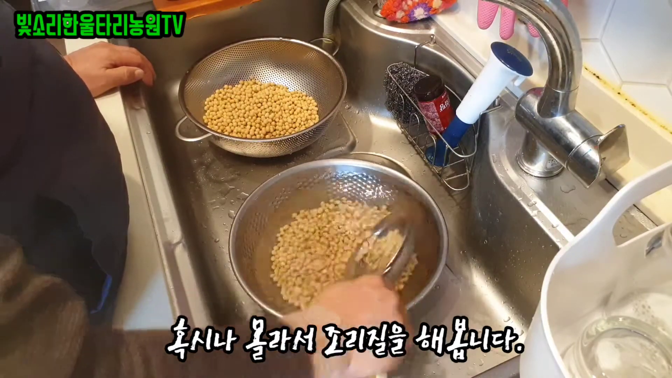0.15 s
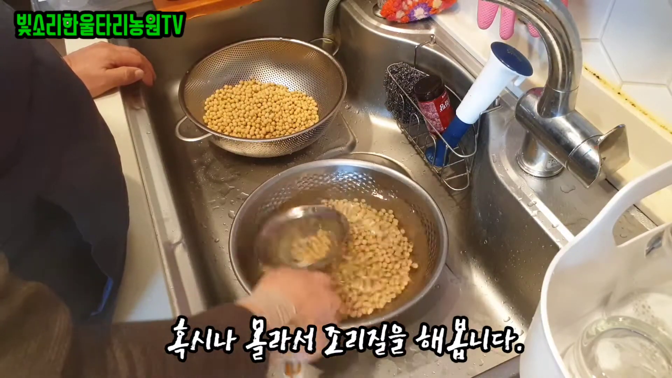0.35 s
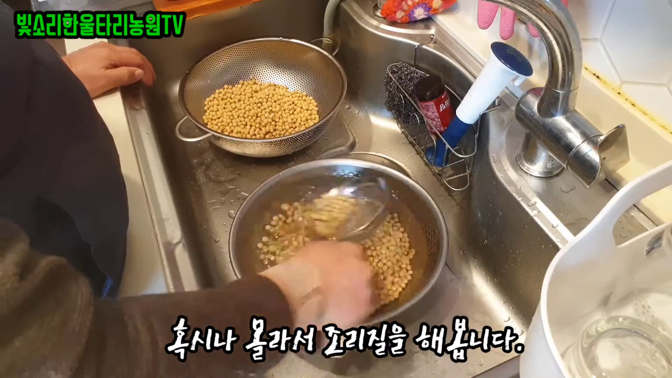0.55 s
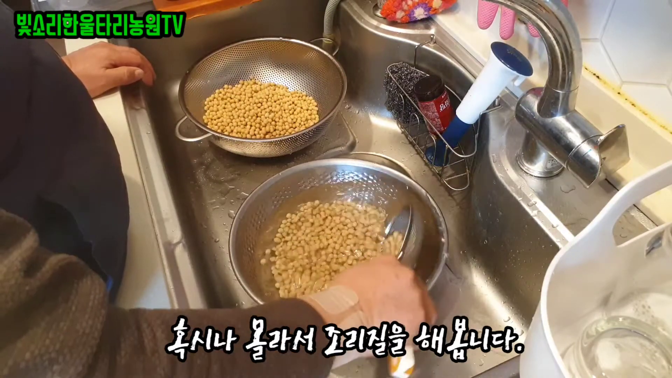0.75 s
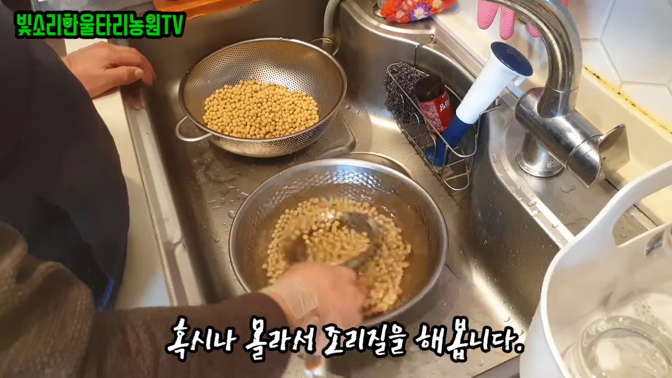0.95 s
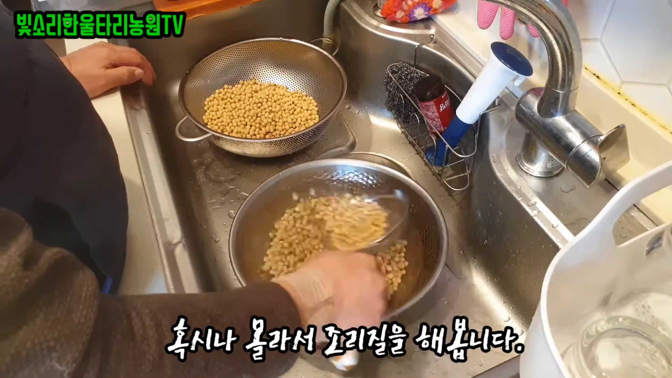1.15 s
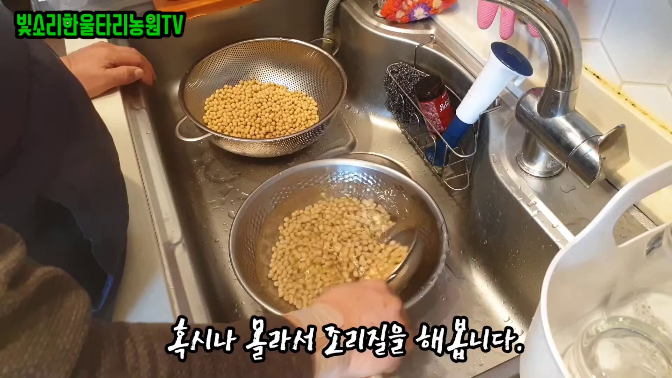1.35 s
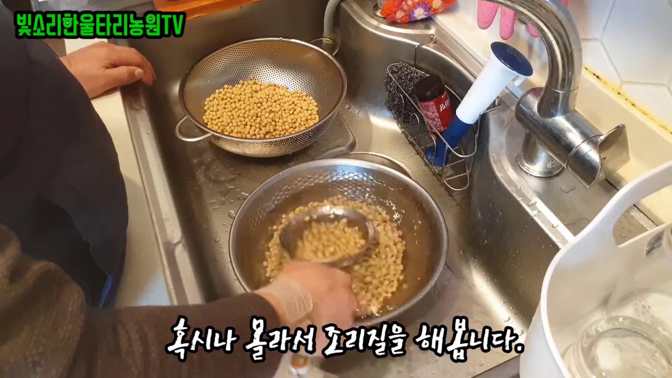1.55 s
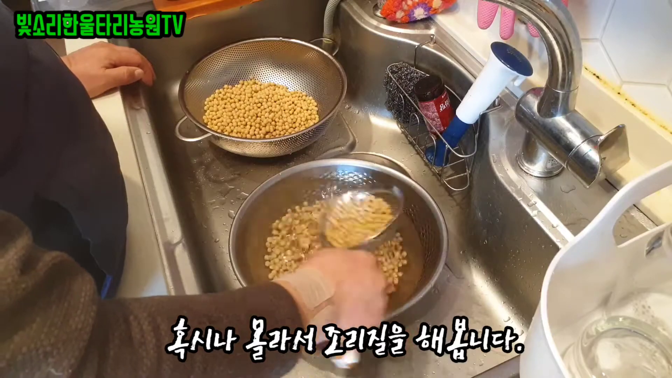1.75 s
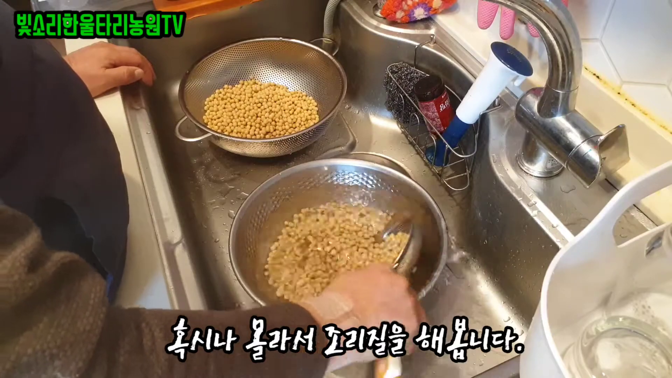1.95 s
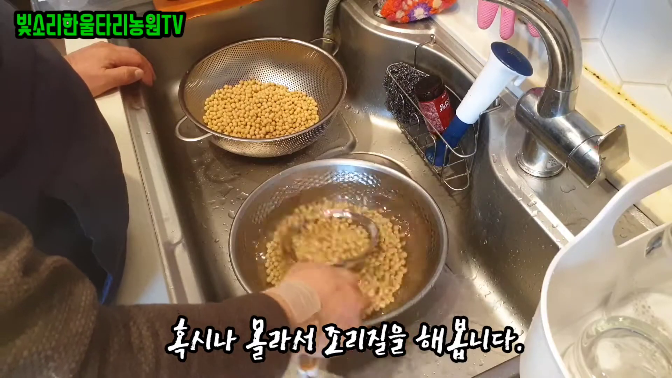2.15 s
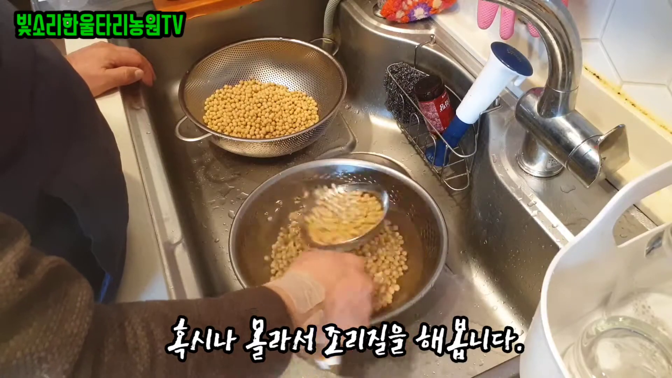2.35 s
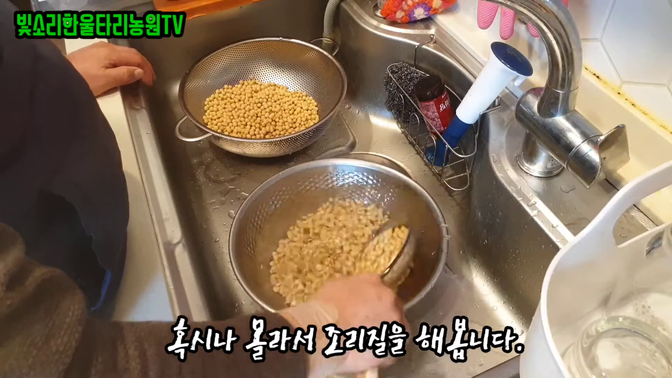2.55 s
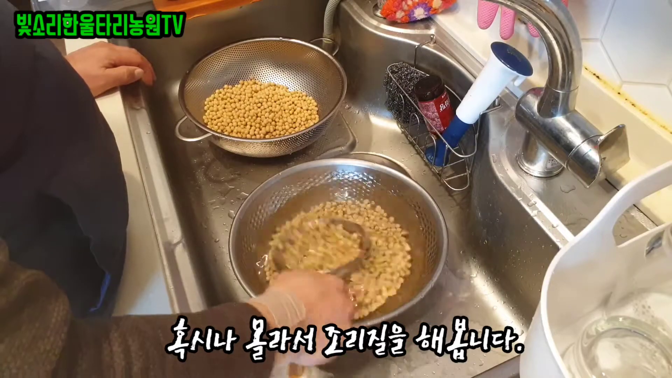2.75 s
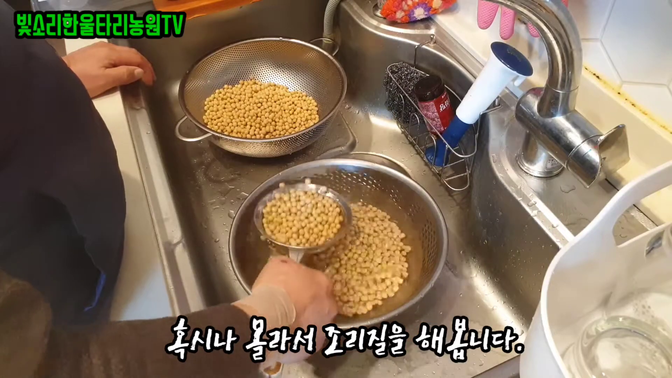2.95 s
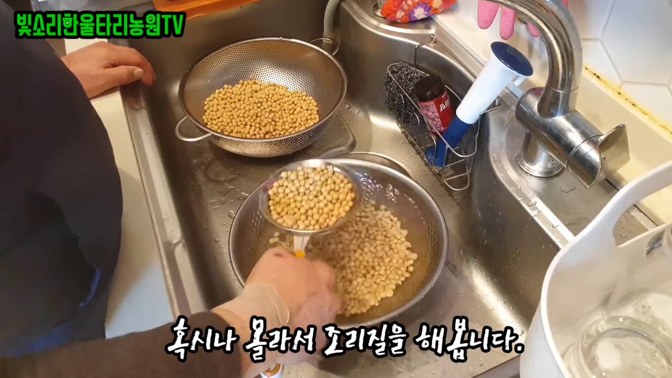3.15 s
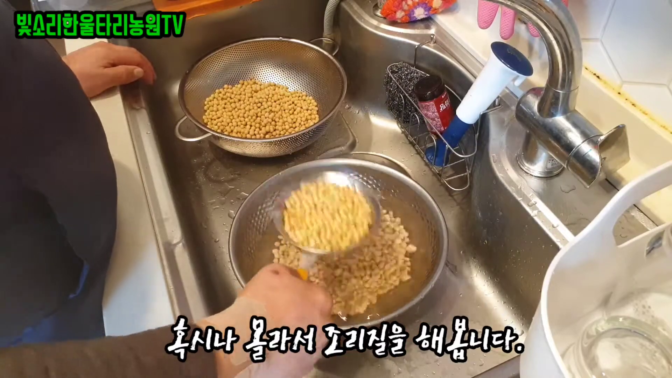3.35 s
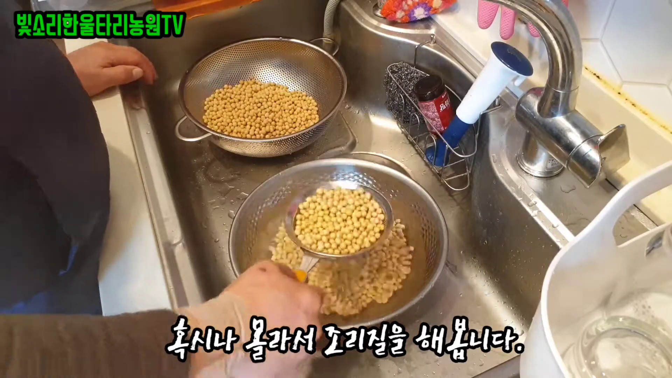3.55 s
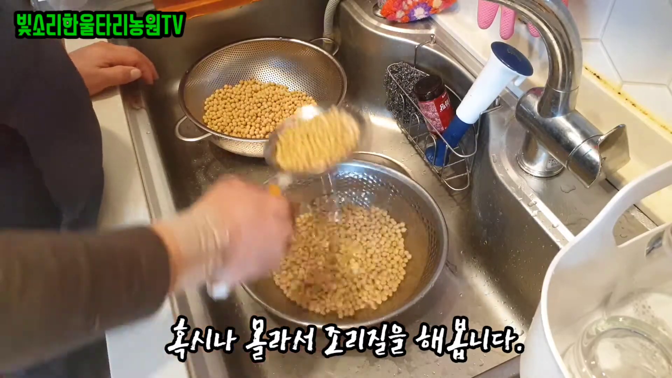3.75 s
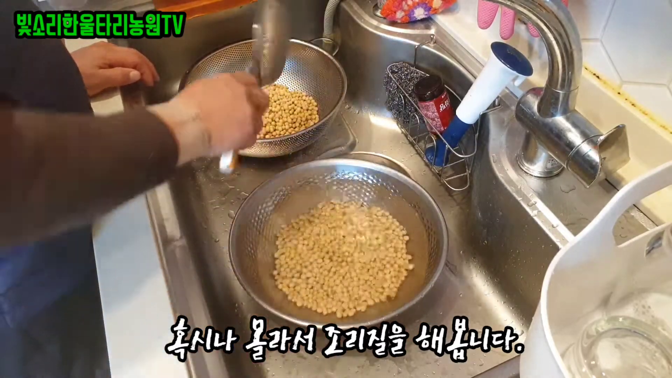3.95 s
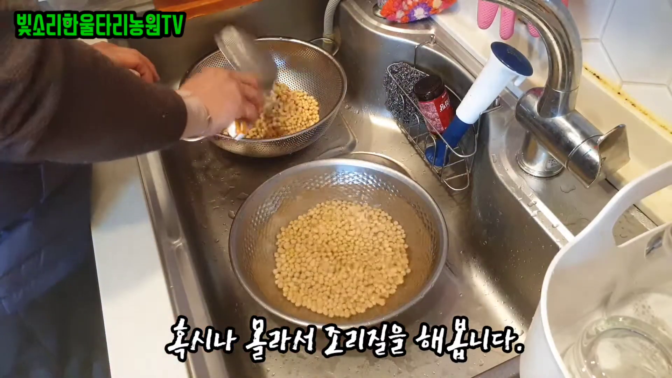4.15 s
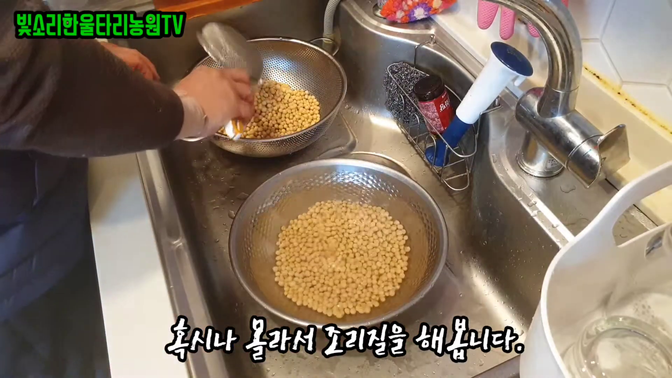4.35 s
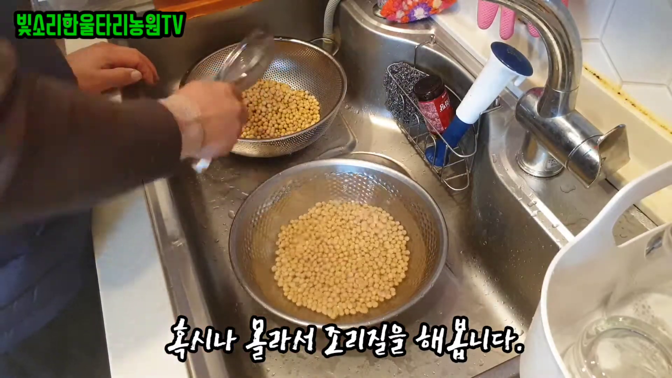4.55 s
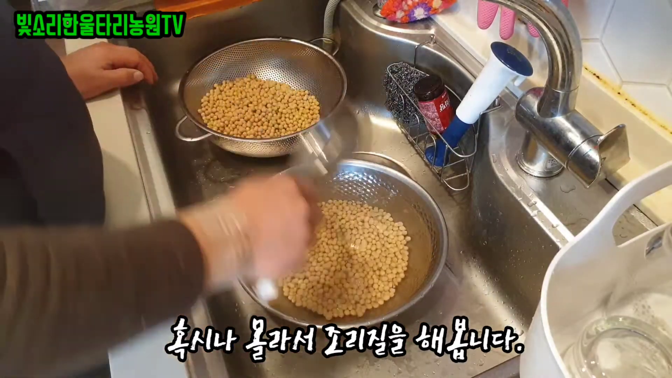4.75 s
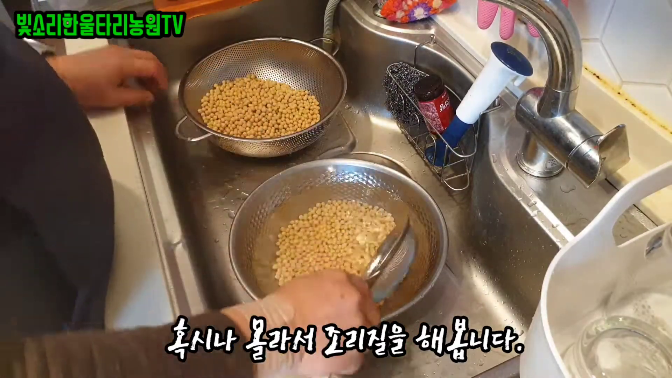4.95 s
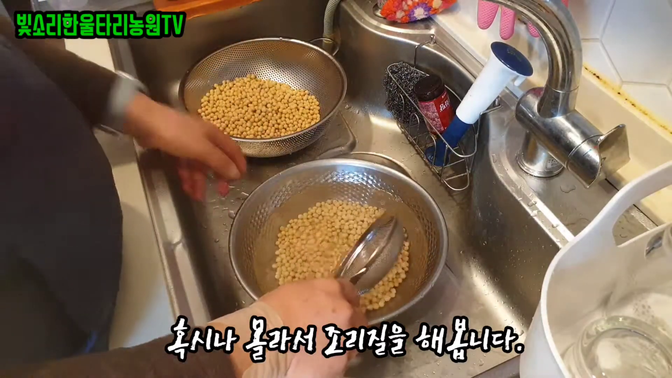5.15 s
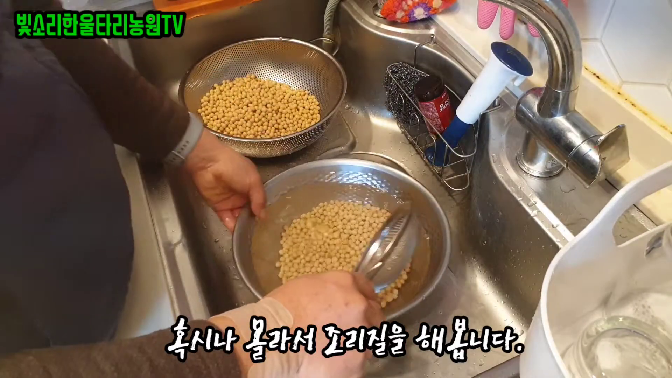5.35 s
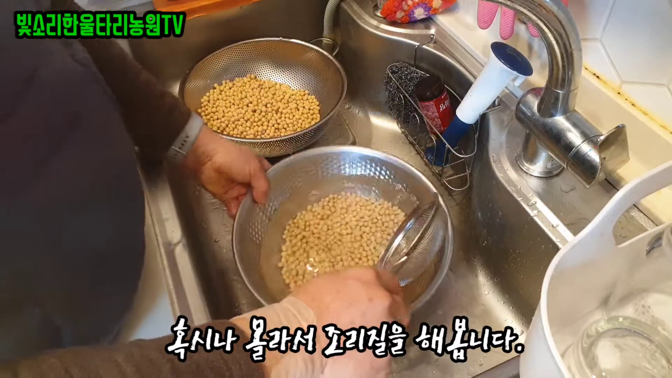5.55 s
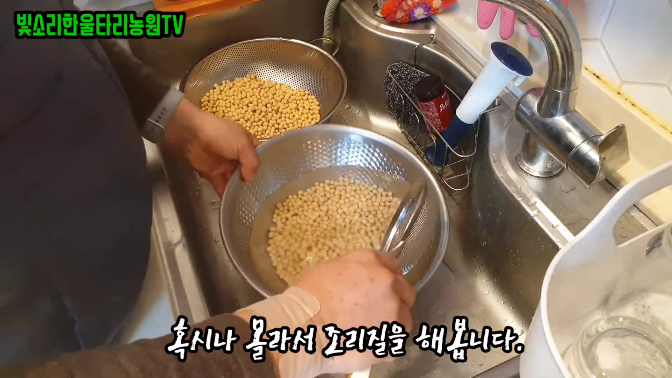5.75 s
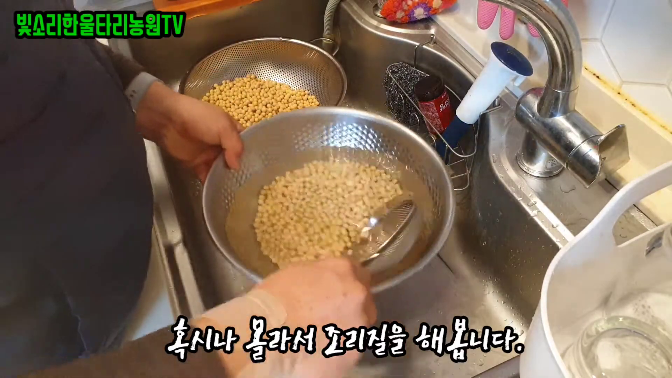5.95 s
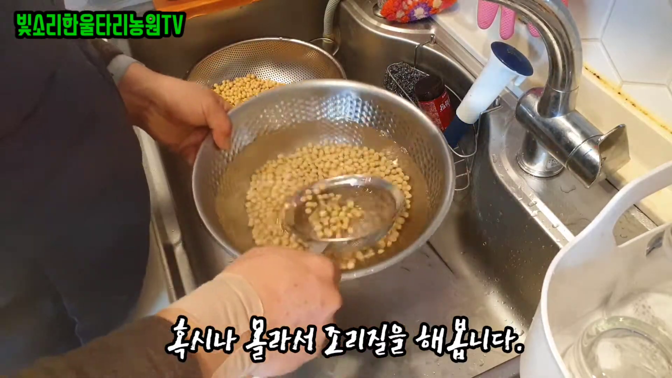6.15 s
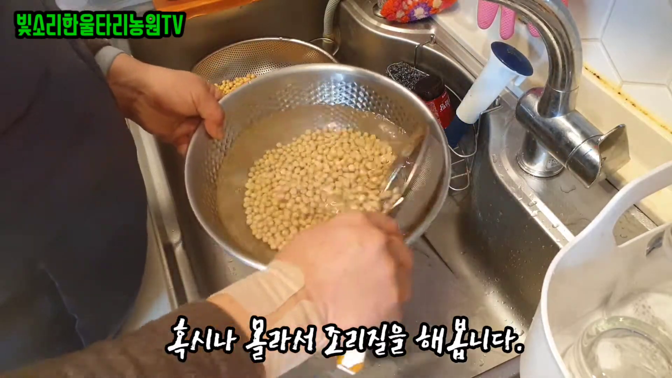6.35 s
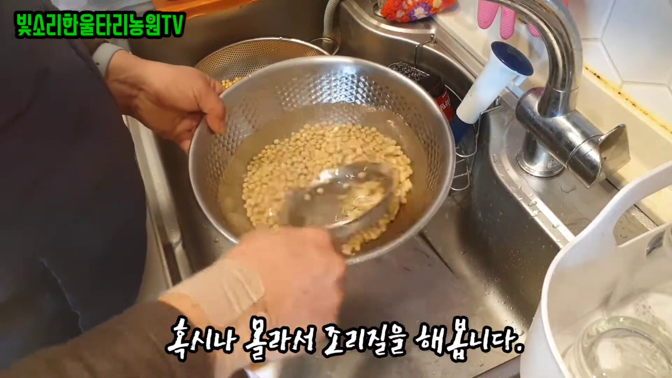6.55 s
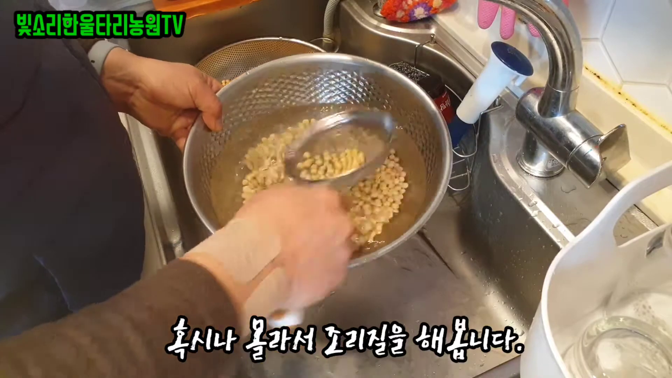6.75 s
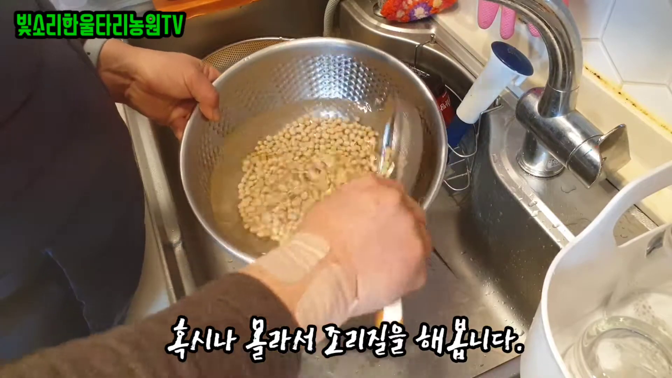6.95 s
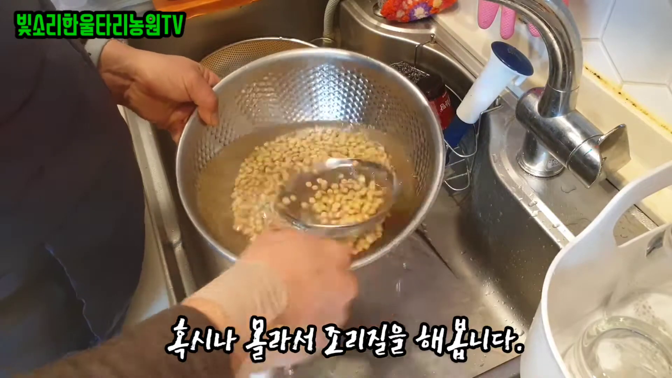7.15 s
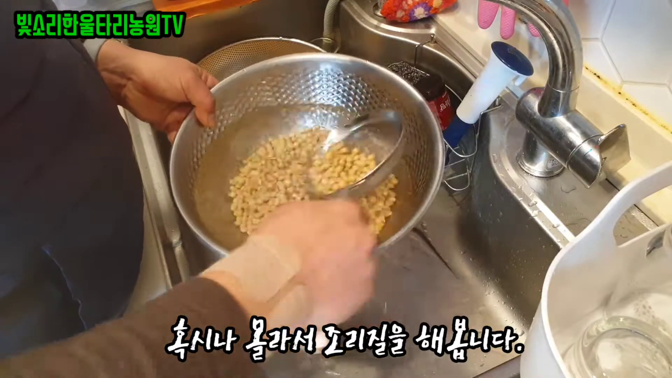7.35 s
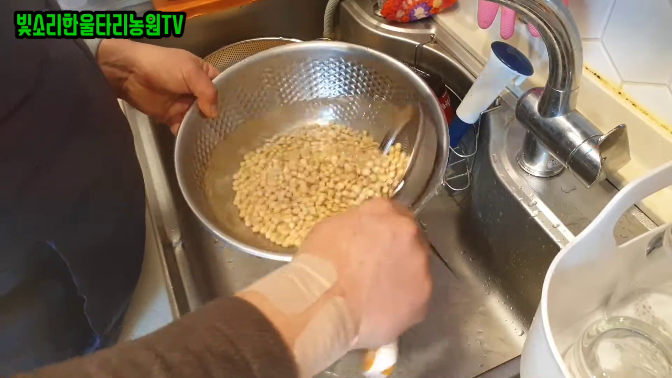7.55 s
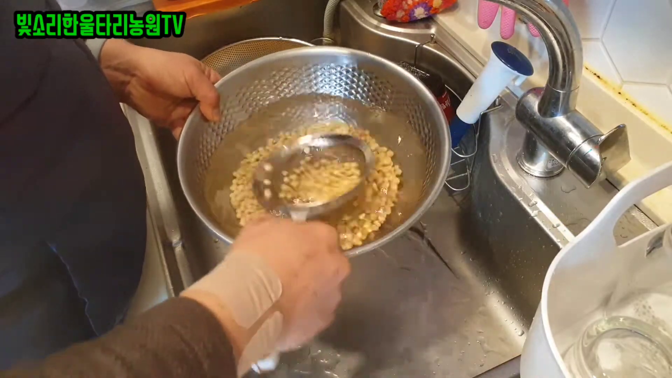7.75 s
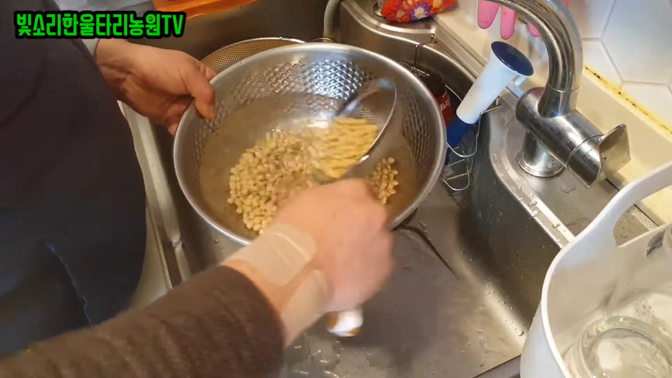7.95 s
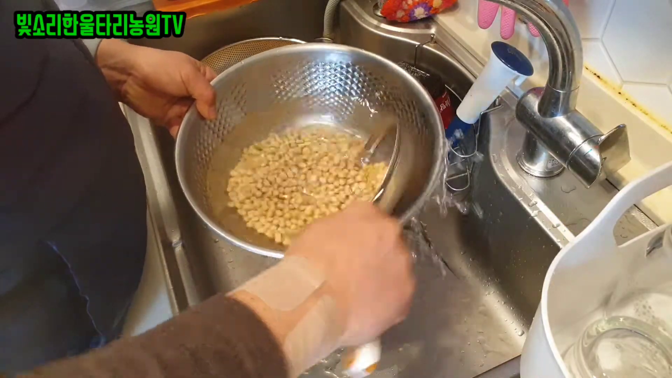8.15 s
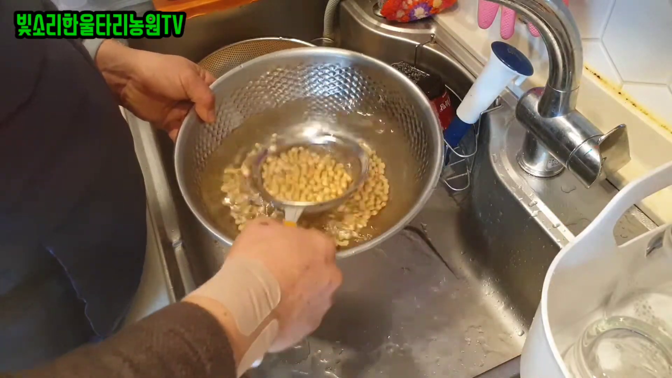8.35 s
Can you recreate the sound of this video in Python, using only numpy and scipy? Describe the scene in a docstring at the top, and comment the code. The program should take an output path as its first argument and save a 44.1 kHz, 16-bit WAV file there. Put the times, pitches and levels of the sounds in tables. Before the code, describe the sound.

A mesh scoop swirls beans through water with gritty, splashy scrapes; a pause brings one bright metallic bean dump, then brisk swishing returns.

```python
"""Soybeans are swirled with a mesh scoop in a perforated steel bowl of water that stands in a kitchen sink.
Each stroke is shaped noise: random contacts for beans on steel, bubble tones for churned water, crackle for spray.
Drags, bumps and dull knocks boom in the sink. A scoopful drips, then is tipped rattling into a colander,
which rings on its own modes. The bowl is tilted up from the sink and the sifting goes on over faint room noise."""
import sys
import numpy as np
from scipy import signal
from scipy.fft import rfft, irfft
from scipy.io import wavfile
from scipy.ndimage import uniform_filter1d, map_coordinates

SR = 44100
rng = np.random.default_rng(int(sys.argv[2]) if len(sys.argv) > 2 else 0)


def put_to_file(sound):
    """Save the sound as 16-bit audio at rate SR, in the file named by the first command-line argument."""
    columns = np.atleast_2d(sound).T  # one column per channel
    safe = np.clip(columns, -1, 1)
    whole_steps = np.round(safe * 32767)
    wavfile.write(sys.argv[1], SR, whole_steps.astype(np.int16))


N = 374850
TIME = np.arange(N) / SR

# All table levels are relative: each source and the final mix apply further gain.
# Strokes of the scoop through the beans. Each row: start in seconds, length in seconds,
# beans in dB, churned water in dB, deep slosh in dB, spray in dB.
STROKES = [(0.345, 0.11, -32, -39, -47.5, -48.5), (0.94, 0.072, -31.5, -34.5, -41.5, -40.5),
           (1.51, 0.07, -30.5, -34.5, -39, -43.5), (1.985, 0.044, -30.5, -41, -50, -45),
           (2.13, 0.069, -31.5, -35, -42.5, -42), (2.69, 0.16, -34, -37, -46.5, -47),
           (5.62, 0.13, -43, -52.5, -58, -79), (6.04, 0.09, -33, -42, -54, -49.5),
           (6.6, 0.057, -30, -47, -49, -44.5), (7.08, 0.13, -30, -48, -47.5, -49.5),
           (7.715, 0.089, -29, -38, -52, -41.5), (8.29, 0.037, -24.5, -34.5, -47, -35.5)]
STROKE_RISE_DB_PER_S, STROKE_FALL_DB_PER_S = 205.5, 158.5
STROKE_PUSH_DB = 1.5  # the level grows through each stroke as the scoop speeds up
SLOSH_RISE_DB_PER_S, SLOSH_FALL_DB_PER_S = 136, 136
# Water running back through the mesh between strokes. Each row: start in seconds, length in seconds,
# water in dB, spray in dB.
BACKWASH = [(0.03, 0.039, -39, -44.5), (0.18, 0.18, -45.5, -51), (0.56, 0.04, -40, -59),
            (0.625, 0.032, -37, -44.5), (0.79, 0.073, -39, -50), (1.15, 0.049, -38, -47),
            (1.3, 0.084, -48, -56), (1.74, 0.063, -41.5, -56), (2.51, .06, -55, -51),
            (2.96, 0.11, -42.5, -62), (3.62, 0.017, -45.5, -64), (6.43, 0.018, -41.5, -48),
            (6.9, 0.066, -39, -44.5), (7.45, 0.044, -38, -42.5), (7.603, 0.011, -44, -42),
            (7.96, 0.054, -36, -42), (8.19, 0.013, -53, -41), (8.44, 0.027, -57, -60)]
WASH_RISE_DB_PER_S, WASH_FALL_DB_PER_S = 389, 235
# Swirl that carries on in the bowl, and dies while the scoop is away. Each row: time in seconds,
# beans in dB, water in dB.
SWIRL = [(0, -42.5, -39.5), (1.3, -41.5, -43), (1.85, -42, -44.5), (2.4, -41, -49), (2.9, -36, -50.5),
         (3.4, -41, -50), (3.7, -46, -47.5), (3.82, -54, -58), (4.13, -58, -58), (4.6, -88, -92.5),
         (5.2, -71.5, -74), (5.55, -59, -54.5), (5.88, -50.5, -72), (6.05, -52.5, -59), (6.35, -44, -49.5),
         (6.8, -41, -42.5), (7.0, -38.5, -47.5), (7.4, -44.5, -42), (8.5, -39.5, -43.5)]
# The scoop scuffing the bowl wall. Each row: start in seconds, level in dB, length in seconds.
SCUFFS = [(0.053, -35, 0.084), (0.459, -28.5, 0.038), (0.615, -28.5, 0.019), (1.384, -33, 0.14),
          (1.507, -29, 0.016), (1.963, -25, 0.012), (1.993, -26.5, 0.03), (2.387, -29.5, 0.038),
          (2.4904, -29, 0.036), (2.526, -30, 0.057), (2.573, -31.5, 0.11), (2.788, -28.5, 0.056),
          (2.952, -25, 0.051), (3.005, -27.5, 0.051), (3.118, -29.5, 0.051), (3.229, -31, 0.063),
          (3.2605, -24.5, 0.014), (3.616, -40, 0.043), (6.026, -31, 0.065), (6.425, -25, 0.051),
          (6.465, -23, 0.037), (6.569, -29, 0.077), (7.455, -27, 0.015), (7.597, -22, 0.061),
          (7.682, -27, 0.19), (8.176, -25, 0.13), (8.3, -20.5, 0.035)]
# Single beans and drops ticking on steel. Each row: start in seconds, level in dB, boost above 8 kHz in dB.
TICKS = [(0.3175, -26, 1), (0.619, -31, 4), (1.3216, -30, 5), (1.906, -31, -2), (3.1183, -19, -12),
         (3.7239, -36.5, 6), (3.75, -35.5, 4), (3.8265, -39.5, 13), (3.8884, -44, 21), (3.9774, -37.5, -13),
         (4.037, -43, -7), (4.6044, -48, 11), (4.7105, -51, -13.5), (5.0363, -24.5, -1.5),
         (5.9034, -35.5, -8), (6.5733, -17.5, -6), (6.8926, -29, 18), (6.9764, -26.5, 19),
         (8.0886, -29.5, 27), (8.4435, -32, 18)]
# Drops falling from the lifted scoop. Each row: start in seconds, level in dB, bubble pitch in Hz.
DRIPS = [(0.5242, -45, 1160), (0.5923, -31, 2920), (2.9595, -33, 1910), (3.379, -39.5, 1740),
         (3.411, -43, 1530), (3.4844, -39.5, 1520), (3.6259, -30, 1620), (3.6367, -39.5, 1890),
         (3.691, -37.5, 1910), (3.6964, -38, 3280), (3.7245, -33, 1410), (3.7246, -42, 2080),
         (3.7435, -47, 1410), (3.7703, -44, 1200), (3.8292, -48, 1320)]
# Air pockets gulping as the scoop leaves the water. Each row: centre in seconds, level in dB, pitch in Hz.
GULPS = [(3.037, -41, 573), (3.073, -39, 842)]
GULP_WIDTH_S, GULP_CLIMB_HZ_PER_S = 0.0096, 8600
# Waves slapping the wall of the tilted bowl. Each row: start in seconds, length in seconds, level in dB.
SLAPS = [(6.07, 0.087, -56.5), (6.63, 0.039, -53), (7.32, 0.11, -60.5), (7.76, 0.045, -58.5),
         (8.29, 0.11, -58), (8.435, .06, -50.5)]
LIFT_S, LIFT_LENGTH_S = 5.5, .5
# Scoop and clumps of beans striking the colander. Each row: start in seconds, level in dB, low cut in Hz.
TAPS = [(4.173, -31.5, 1800), (4.2117, -11.5, 1510), (4.231, -15, 900), (4.297, -16.5, 3800),
        (4.354, -41, 700), (4.408, -27.5, 1300), (4.458, -21, 4850)]
# A scoopful tipped into the colander: the bulk lands at once, the rest trickles after it.
POUR_S, BULK_S, BULK_DB, TRICKLE_S, TRICKLE_DB = 4.212, 0.031, -20.5, 0.14, -33.5
POUR_RISE_DB_PER_S, BULK_FALL_DB_PER_S, TRICKLE_FALL_DB_PER_S = 500, 480, 144
# Low booms and rumbles of the sink, from drags and, once the bowl is tilted up, dull knocks.
# Each row: start in seconds, length in seconds, boom in dB, deep rumble in dB.
BOOMS = [(0, .24, -53, -70), (0.33, .05, -39.5, -56), (0.46, 0.042, -48, -43), (0.92, 0.14, -40, -45),
         (1.13, 0.12, -62, -59), (1.53, 0.063, -31, -62), (2.07, 0.13, -34, -40.5), (2.35, 0.035, -60, -73),
         (2.72, .12, -34.5, -48), (3.61, 0.16, -69, -67), (4.24, 0.045, -41, -41.5),
         (4.34, 0.18, -51.5, -57), (5.08, .06, -69, -52), (5.39, 0.024, -52, -42.5),
         (5.48, 0.057, -43.5, -40), (5.62, 0.039, -64, -41), (6.09, .06, -64, -80), (6.64, 0.067, -59, -69),
         (7.32, .1, -53, -52), (7.915, .07, -62, -47), (8.44, 0.077, -46, -44)]
BOOM_RISE_DB_PER_S, BOOM_FALL_DB_PER_S = 480, 185
# The bowl bumping the sink. Each row: start in seconds, level in dB, pitch of the answering panel in Hz.
BUMPS = [(1.538, -24, 141.4), (2.129, -18, 136), (2.749, -23, 142), (4.225, -39, 69.4), (5.388, -52, 80),
         (5.485, -47, 100)]

# Spectra of the sources. Each row: frequency in Hz, level in dB.
BEAN_COLOUR = [(300, -46.5), (900, -36.5), (1600, -24), (2200, -11.5), (3200, -8), (4400, -4), (6000, -4),
               (7200, -10), (8200, -23), (11000, -23), (15500, -57)]
SPRAY_COLOUR = [(3000, -18), (7000, 9.5), (8500, -0.5), (11000, 2), (13000, 1.5), (15500, -8)]
WATER_COLOUR = [(500, -26.5), (1000, -11.5), (1400, -3), (2000, -1.5), (2800, -2.5), (4500, -6),
                (8000, -26.5)]
SLOSH_COLOUR = [(150, -19.5), (280, -30.5), (370, -3), (500, 1), (700, -0.5), (1000, 0.5), (1600, 3.5),
                (4000, -51)]
TICK_COLOUR = [(500, -16), (2600, -27), (4000, 2), (6500, 10.5), (8500, -1.5), (12000, -3), (15500, -2.5)]
SLAP_COLOUR = [(80, -17), (150, -2.5), (260, -4.5), (370, -4.5), (460, 5), (560, -4), (700, -3),
               (1100, -36), (3000, -64)]
POUR_COLOUR = [(200, -28), (700, -18), (1200, -13.5), (2400, -4), (4500, -2), (7200, -2.5), (8400, -14),
               (10500, -8.5), (15500, -13)]
ROOM_COLOUR = [(18, -38), (30, 5), (69, -5.5), (102, -23), (216, -4), (274, -29.5), (320, -8.5),
               (437, -15.5), (662, -9.5), (837, -9), (1370, -20.5), (6040, -8.5), (8250, -15.5),
               (15000, -10.5)]
ROOM_DB = -61.5

# Modes of the water-filled bowl. Each row: frequency in Hz, level in dB, t60 in seconds.
BOWL_MODES = [(396, -32, 0.057), (481, 3.5, 0.046), (691, -5, 0.14), (876, -3, 0.16), (1100, -4.5, 0.08),
              (1412, 4.5, 0.111), (1856, 16, 0.088), (2440, 6.5, 0.27), (3227, 8.5, 0.17)]
BOWL_RING_DB = -16
# Modes of the colander. Each row: frequency in Hz, level in dB.
COLANDER_MODES = [(1375, 5.5), (1816, 9), (2100, -5.5), (2622, 10), (2859, -15.5), (3194, -3), (3962, -7),
                  (4417, 0), (4786, 3), (5399, 6.5), (5686, -4), (6272, -7), (7305, -8), (10830, 2),
                  (11307, -2), (12166, -7), (12660, 3), (13469, -5), (14032, 4), (14513, -8), (14821, -7)]
# Modes of the sink floor, then of the whole basin. Each row: frequency in Hz, level in dB, t60 in seconds.
SINK_MODES = [(141.8, -5, 0.4), (168.5, -19, .1), (214.5, -16.5, 0.19), (349, -7, 0.043), (463, -31, .16)]
BASIN_MODES = [(61, -1.5, 0.34), (102.8, 2.5, 0.24), (120, -8, .15)]
WALL_T60_S, ROOM_T60_S = .046, .28
# Balance of the two microphones. Each row: frequency in Hz, left minus right in dB.
SIDES = [(60, -4), (200, -6), (380, -2), (1300, -1), (2400, -2.5), (4400, -4), (5800, -5), (6700, -1),
         (7500, 8), (8600, 0.5), (11000, 2.5), (15000, -1)]
# Likeness of the two microphones. Each row: frequency in Hz, correlation from 0 to 1.
ALIKE = [(60, 0.56), (150, 0.61), (300, 0.22), (640, 0.33), (1400, 0.25), (3100, 0.012), (7000, 0.00022)]
EDGE_HZ = 15550


def beans(stroke, gain_db=-1, per_s=2200, clump_db=1):
    """Wet beans patter along the steel, denser the harder the stroke, and the bowl rings faintly."""
    density_per_s = per_s * (.2 + evened(stroke))
    patter = steadied(clicks(density_per_s, 4), .025)
    contacts = stroke * patter * gain_of(gain_db + clump_db * wander(130)) + scuffs()
    freed = 0.52 + 0.66 * lifted()  # tilted up from the sink, the bowl rings more
    bowl_ring = gain_of(BOWL_RING_DB) * through(contacts * freed, ring(BOWL_MODES))
    return through(contacts, colour(BEAN_COLOUR)), bowl_ring


def scuffs(gain_db=-1):
    """Short bursts of contacts as the rim of the scoop catches on the perforations."""
    out, grit = np.zeros(N), steadied(clicks(9000, 2), .003)
    t = TIME[:SR // 5]
    for s, db, length_s in SCUFFS:
        shape = (1 - np.exp(-t / .002)) * np.exp(-(2 * t / length_s) ** 2)
        add(out, s, gain_of(db + gain_db) * shape)
    return out * grit


def motion(wash_beans_db=-3, swirl_spray_db=-15, wash_slosh_db=-20, swirl_slosh_db=-17):
    """Strokes, backwash and swirl add in power to drive sliding beans, spray, churn and slosh."""
    stroke = STROKE_RISE_DB_PER_S, STROKE_FALL_DB_PER_S, STROKE_PUSH_DB
    splash = WASH_RISE_DB_PER_S, WASH_FALL_DB_PER_S
    s, *columns = np.transpose(SWIRL)
    drifting, swirling = (gain_of(np.interp(TIME, s, db)) for db in columns)
    wash = swells(BACKWASH, *splash, column=2)
    wash_spray = swells(BACKWASH, *splash, column=3)
    plunge = swells(STROKES, SLOSH_RISE_DB_PER_S, SLOSH_FALL_DB_PER_S, column=4)
    sliding = [swells(STROKES, *stroke, column=2), gain_of(wash_beans_db) * wash, drifting]
    spraying = [swells(STROKES, *stroke, column=5), wash_spray, gain_of(swirl_spray_db) * swirling]
    churning = [swells(STROKES, *stroke, column=3), wash, swirling]
    sloshing = [plunge, gain_of(wash_slosh_db) * wash, gain_of(swirl_slosh_db) * swirling]
    return np.linalg.norm([sliding, spraying, churning, sloshing], axis=1)


def lifted():
    """Goes from 0 to 1 as the bowl is tilted up from the sink floor."""
    return np.clip((TIME - LIFT_S) / LIFT_LENGTH_S, 0, 1)


def water(churning, sloshing, gain_db=-2, slosh_db=-2, cycles=3.24, splash=1.0, count=40):
    """Bubbles of many sizes and splashes churn behind the scoop, heard duller where it plunges."""
    cloud = np.zeros(N)
    births, size_class = clicks(3000, 2.5), rng.integers(0, count, N)
    for k, hz in enumerate(np.geomspace(280, 5000, count)):
        pop = unit(bubble(hz, cycles * rng.uniform(0.26, 2.47), 0.013))
        cloud += np.sqrt(hz) * through(births * (size_class == k), pop)[0]
    churn = evened(cloud) + splash * clicks(2500, 1.2)
    fine = steadied(through(churn, colour(WATER_COLOUR))[0], 0.029) * churning
    deep = steadied(through(churn, colour(SLOSH_COLOUR))[0], 0.037) * sloshing
    return gain_of(gain_db) * fine, gain_of(slosh_db) * deep


def bubble(hz, cycles, rise):
    """A bubble rings briefly, and its pitch climbs as it nears the surface."""
    age = TIME[:int(5 * cycles / hz * SR)] * hz / cycles  # in decay times
    tone = np.sin(2 * np.pi * cycles * (age + rise * age ** 2 / 2))
    return tone * np.exp(-age) * (1 - np.exp(-age * cycles))


def spray(flow, gain_db=-1, clump_db=3.5):
    """Water strained through the mesh bursts in tiny crackles."""
    crackle = steadied(clicks(2200, 4.5), .04)
    return through(crackle * flow * gain_of(gain_db + clump_db * wander(40)), colour(SPRAY_COLOUR))


def ticks(gain_db=17, decay_s=0.0024):
    """Lone hard contacts, each a noise snap with its own brightness."""
    out, t = np.zeros(N), TIME[:SR // 50]
    for s, db, treble_db in TICKS:
        tone = colour([(hz, d + treble_db * (hz > 8000)) for hz, d in TICK_COLOUR])
        snap = unit(rng.standard_normal(len(t)) * np.exp(-t / decay_s))
        add(out, s, gain_of(db + gain_db) * np.convolve(snap, tone))
    return out


def drips(gain_db=4, cycles=10, rise=0.059):
    """Single drops splat into the bowl and trap one bubble each."""
    out, t = np.zeros(N), TIME[:SR // 100]
    for s, db, hz in DRIPS:
        splat = .6 * rng.standard_normal(len(t)) * np.exp(-t / .001)
        add(out, s, gain_of(db) * splat)
        add(out, s, gain_of(db + gain_db) * bubble(hz, cycles, rise))
    return out


def gulp(flutter_db=3, waver_hz=50):
    """The air pockets under the rising scoop wobble and shrink, so their notes flutter and climb."""
    out, wobble = np.zeros(N), np.cumsum(waver_hz * wander(250)) / SR
    for s, db, hz in GULPS:
        t = TIME - s
        turns = hz * t + GULP_CLIMB_HZ_PER_S * t ** 2 / 2 + wobble
        out += gain_of(db) * np.exp(-(t / GULP_WIDTH_S) ** 2) * np.sin(2 * np.pi * turns)
    return out * gain_of(flutter_db * wander(200))


def slaps(gain_db=0, rise_db_per_s=500, fall_db_per_s=200):
    """A wave meets the wall of the tilted bowl with a dull, hollow slap."""
    lapping = steadied(through(clicks(1500, 2), colour(SLAP_COLOUR))[0], .04)
    return gain_of(gain_db) * lapping * swells(SLAPS, rise_db_per_s, fall_db_per_s, column=2)


def colander(gain_db=-1, tap_db=20, ring_db=-12, shimmer_db=-6, rattle_s=0.014, count=300, ring_t60_s=.17):
    """Beans and scoop land in the dry colander: the clatter, and the ring of its thin steel."""
    blows = gain_of(gain_db) * pour() * steadied(clicks(2200, 5.4), 0.0048)
    t = TIME[:SR // 20]
    for s, db, low_hz in TAPS:
        burst = rng.standard_normal(len(t)) * np.exp(-t / rattle_s)
        high_pass = signal.butter(3, low_hz, "high", fs=SR, output="sos")
        add(blows, s, gain_of(db + tap_db) * unit(signal.sosfilt(high_pass, burst)))
    steel = ring([(hz, db, ring_t60_s) for hz, db in COLANDER_MODES])
    # a thin shell also has crowds of weak modes, which build up after each blow
    shimmer = ring([(hz, 0, ring_t60_s) for hz in rng.uniform(3000, 15500, count)])
    shimmer = shimmer * (1 - np.exp(-TIME[:SR // 2] / 0.0046))
    clatter = through(blows, colour(POUR_COLOUR))
    return clatter, gain_of(shimmer_db) * through(clatter, shimmer) + gain_of(ring_db) * through(blows, steel)


def pour():
    """The flow of beans from the scoop into the colander: bulk and trickle add in power."""
    bulk = swell(POUR_S, BULK_S, POUR_RISE_DB_PER_S, BULK_FALL_DB_PER_S)
    trickle = swell(POUR_S, TRICKLE_S, POUR_RISE_DB_PER_S, TRICKLE_FALL_DB_PER_S)
    return np.hypot(gain_of(BULK_DB) * bulk, gain_of(TRICKLE_DB) * trickle)


def sink_floor(sloshing, gain_db=-1, deep_db=-3, bump_db=0, push_s=0.019, slosh_db=-7):
    """Drags, knocks and bumps boom like a drum; slosh shakes the floor too until the bowl is tilted up."""
    grain_colour = colour([(30, -19), (60, -5.0), (110, 1.5), (450, -6.0), (900, -11.5)])
    grain = through(clicks(900, 3.6), grain_colour)
    boom, rumble = (swells(BOOMS, BOOM_RISE_DB_PER_S, BOOM_FALL_DB_PER_S, column=k) for k in (2, 3))
    shaken = gain_of(slosh_db) * sloshing * (1 - lifted())
    out = np.hypot(gain_of(gain_db) * boom, shaken) * steadied(through(grain, ring(SINK_MODES))[0], 0.07)
    out += gain_of(deep_db) * rumble * steadied(through(grain, ring(BASIN_MODES))[0], 0.057)
    t = TIME[:SR // 4]
    # the heavy bowl pushes softly and damps its own blow
    push = (t / push_s * np.exp(1 - t / push_s)) ** 2
    for s, db, hz in BUMPS:
        add(out, s, gain_of(db + bump_db) * push * np.sin(2 * np.pi * hz * t))
    return out


def basin(near_db=0, room_db=-7):
    """Quick reflections between the steel walls and the kitchen's tail, at both microphones."""
    t = TIME[:SR // 3]
    near, room = rng.standard_normal((2, 2, len(t))) * (t > .0006)
    near = unit(near * gain_of(-60 * t / WALL_T60_S))
    room = unit(room * gain_of(-60 * t / ROOM_T60_S))
    return gain_of(near_db) * near + gain_of(room_db) * room


def in_sink(x, moves_per_s, count, direct_db=-3):
    """Contacts fall all over the sink, so their lag between microphones and reflections keep changing."""
    lag = 5 * wander(9)  # in samples, opposite at the two microphones
    direct = np.array([map_coordinates(x, [np.arange(N) + side * lag], order=3) for side in (-1, 1)])
    place = np.array([wander(moves_per_s) for _ in range(count)])
    place /= np.linalg.norm(place, axis=0)
    reflected = sum(through(x * share, basin()) for share in place)
    return (gain_of(direct_db) * direct + reflected) / np.sqrt(2)


def kitchen(gain_db=1):
    """The quiet noise of the room, independent at the two microphones until they are blended."""
    return gain_of(ROOM_DB + gain_db) * through(rng.standard_normal((2, N)), colour(ROOM_COLOUR))


def gain_of(db):
    """Decibels to amplitude."""
    return 10 ** (np.asarray(db) / 20)


def evened(x):
    """Scales to an rms of one."""
    return x / np.sqrt(np.mean(x ** 2) + 1e-20)


def unit(x):
    """Scales each response to an energy of one."""
    return x / np.linalg.norm(x, axis=-1, keepdims=True)


def steadied(x, seconds):
    """Evens out the slow swells of a random texture and keeps its grain."""
    return x / np.sqrt(abs(uniform_filter1d(x ** 2, size=int(seconds * SR))) + 1e-9)


def wander(per_s):
    """Slow random curve of rms one, through per_s random points a second."""
    return evened(np.interp(TIME * per_s, np.arange(N), rng.standard_normal(N)))


def clicks(per_s, spread_db):
    """Random tiny impacts, a few of them large; the mean power does not depend on their rate."""
    chance = np.clip(per_s / SR, 1e-5, 1)
    size = gain_of(spread_db * np.minimum(rng.exponential(1, N), 4)) * rng.choice([-1, 1], N)
    return evened(size * (rng.random(N) < chance) / np.sqrt(chance))


def swell(start_s, length_s, rise_db_per_s, fall_db_per_s, push_db=0, t=TIME):
    """Attack, a hold that grows by push_db, and release."""
    early, late = np.maximum(start_s - t, 0), np.maximum(t - start_s - length_s, 0)
    push = push_db * (np.clip((t - start_s) / length_s, 0, 1) - .5)
    return gain_of(push - rise_db_per_s * early - fall_db_per_s * late)


def swells(table, *shape, column):
    """One swell for each row, as strong as the dB in this column; their powers add."""
    t = TIME[::32]
    power = sum((gain_of(row[column]) * swell(row[0], row[1], *shape, t=t)) ** 2 for row in table)
    return np.interp(TIME, t, np.sqrt(power))


def read(points, hz):
    """Reads a spectrum on a log-frequency axis."""
    f, value = np.transpose(points)
    return np.interp(np.log(hz + 1), np.log(f + 1), value)


def colour(points, size=2048):
    """The causal (minimum-phase) click that has this spectrum."""
    log_gain = np.log(gain_of(read(points, abs(np.fft.fftfreq(size, 1 / SR)))))
    spectrum = np.exp(np.conj(signal.hilbert(log_gain)))
    return unit(np.fft.ifft(spectrum).real[:size // 2])


def ring(modes):
    """The dying tones of a struck object."""
    t = TIME[:SR // 2]
    return unit(sum(gain_of(db - 60 * t / t60_s) * np.cos(2 * np.pi * hz * t) for hz, db, t60_s in modes))


def through(x, response):
    """Convolves one or two channels with a response."""
    return signal.oaconvolve(np.atleast_2d(x), np.atleast_2d(response), axes=1)[:, :N]


def add(mix, s, sound):
    """Mixes a sound in at time s."""
    part = mix[max(round(s * SR), 0):][:len(sound)]
    part += sound[:len(part)]


def scene(grains_db=2.0, tones_db=0.5):
    """Grains and tones sound from the sink; low frequencies reach both microphones more alike."""
    sliding, spraying, churning, sloshing = motion()
    patter, bowl_ring = beans(sliding)
    clatter, colander_ring = colander()
    bubbling, slosh = water(churning, sloshing)
    grains = (patter + clatter + spray(spraying) + bubbling + ticks())[0]
    tones = (bowl_ring + colander_ring + slosh + drips() + gulp() + slaps())[0]
    grains = gain_of(grains_db) * in_sink(grains, 130, count=7)
    tones = gain_of(tones_db) * in_sink(tones, 12, count=3)
    left, right = rfft(grains + tones + kitchen())
    # blend the channels to the wanted likeness at each frequency
    turn = np.arcsin(np.clip(read(ALIKE, np.fft.rfftfreq(N, 1 / SR)), -1, 1)) / 2
    pair = [np.cos(turn) * left + np.sin(turn) * right, np.cos(turn) * right + np.sin(turn) * left]
    return irfft(np.array(pair), N) + sink_floor(sloshing)


def record(dry):
    """Each microphone has its own colour; then the band limit."""
    tilt_db = read(SIDES, np.fft.rfftfreq(N, 1 / SR)) / 2
    heard = irfft(rfft(dry) * gain_of([tilt_db, -tilt_db]), N)
    low_pass = signal.firwin(511, EDGE_HZ, window=("kaiser", 9), fs=SR)
    return signal.oaconvolve(heard, low_pass[None], "same")


dry = scene()
out = record(dry)
put_to_file(out)
```